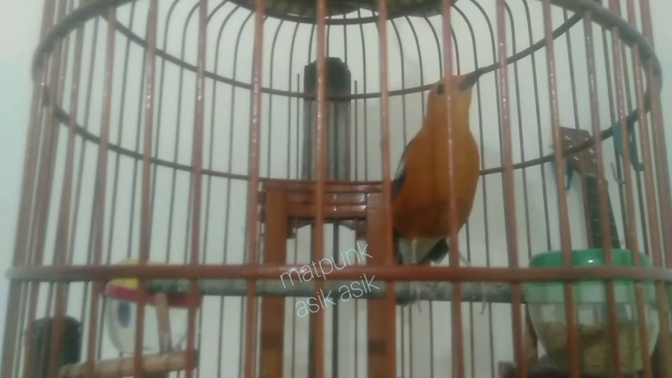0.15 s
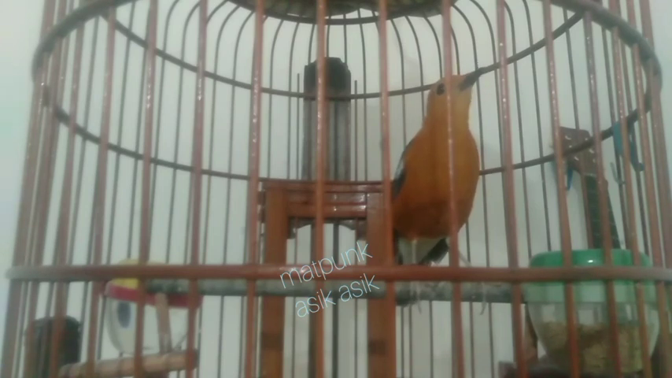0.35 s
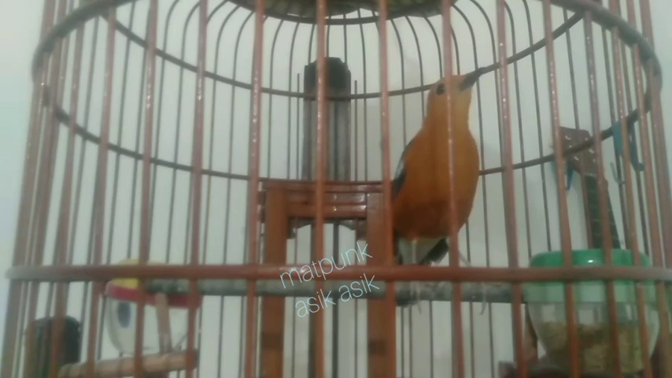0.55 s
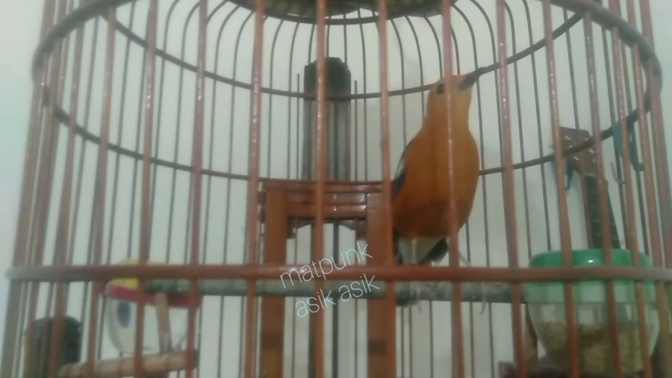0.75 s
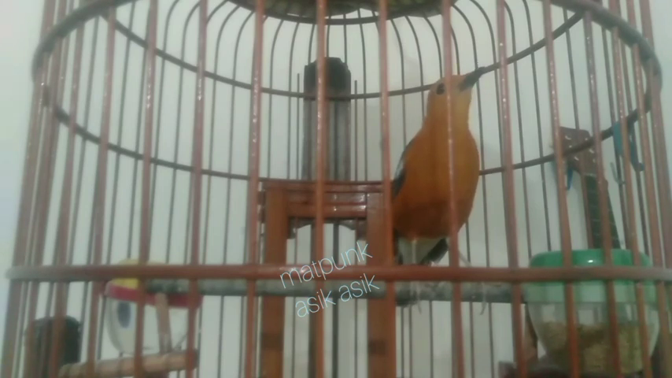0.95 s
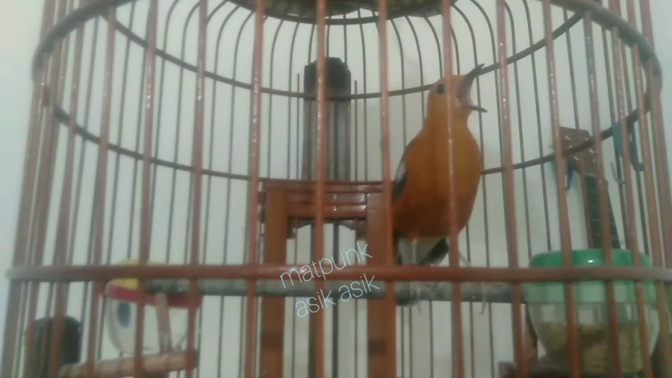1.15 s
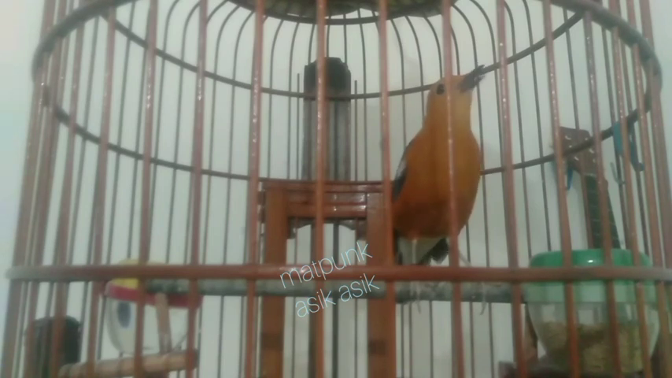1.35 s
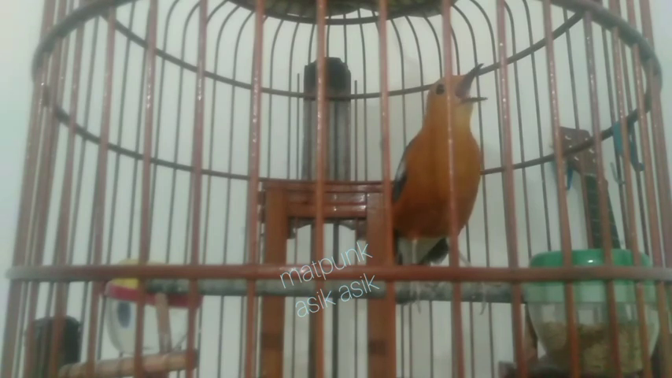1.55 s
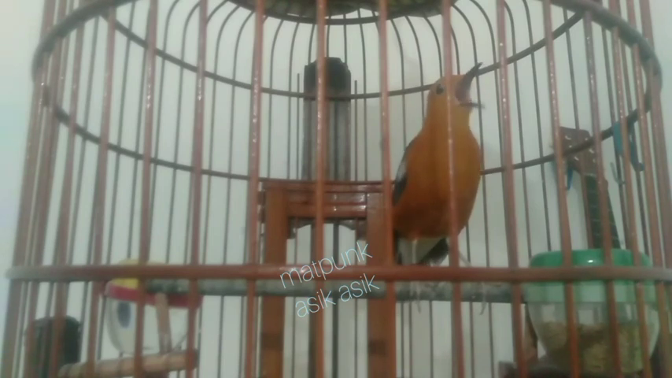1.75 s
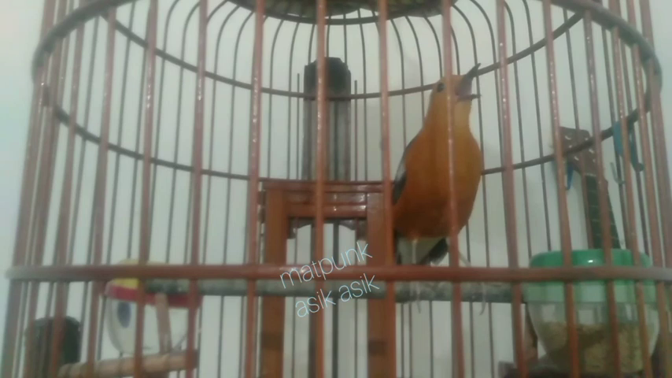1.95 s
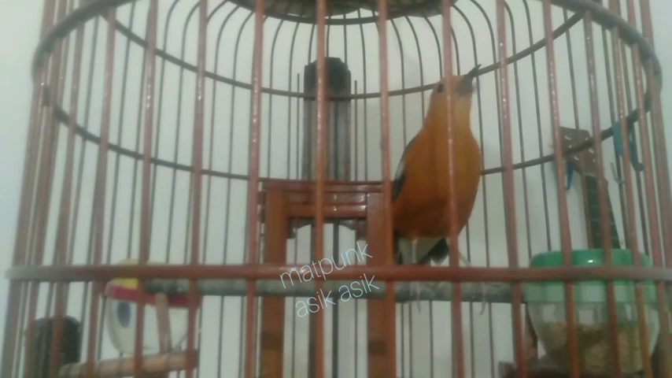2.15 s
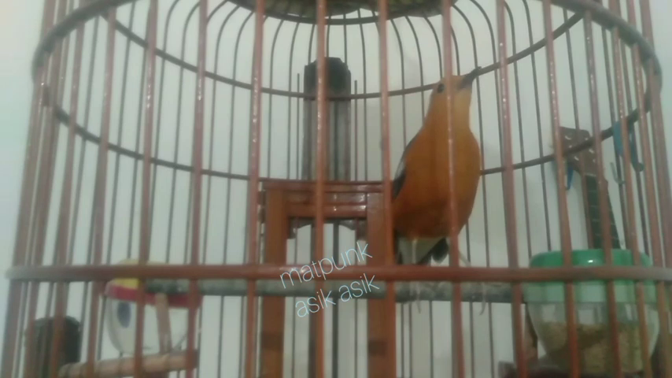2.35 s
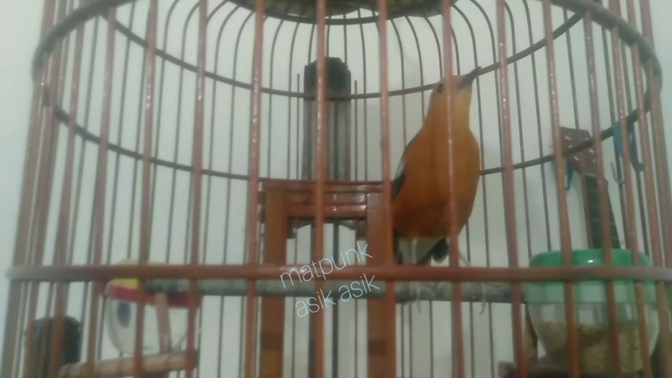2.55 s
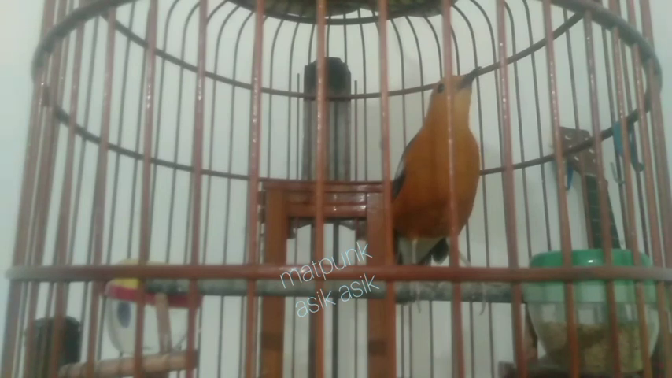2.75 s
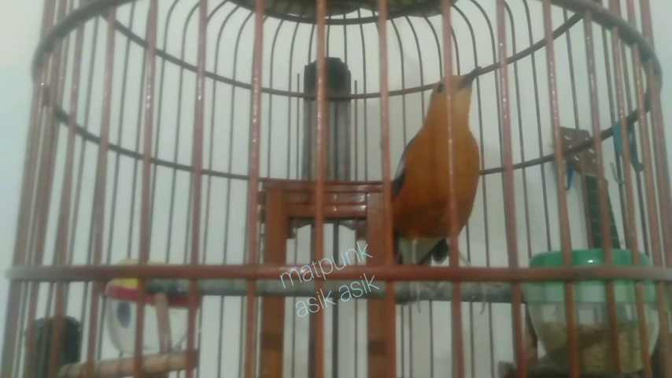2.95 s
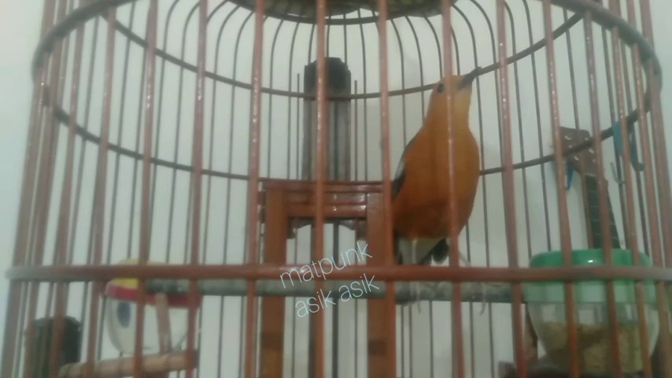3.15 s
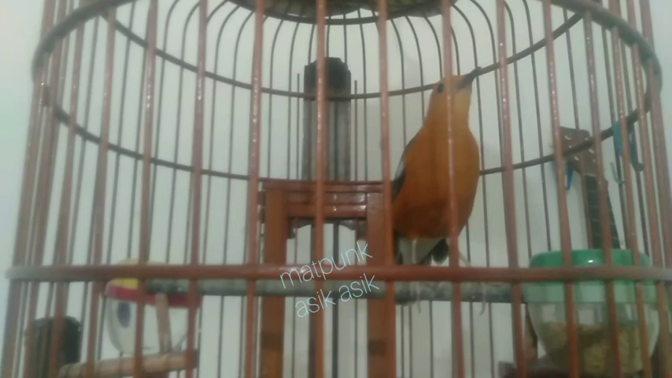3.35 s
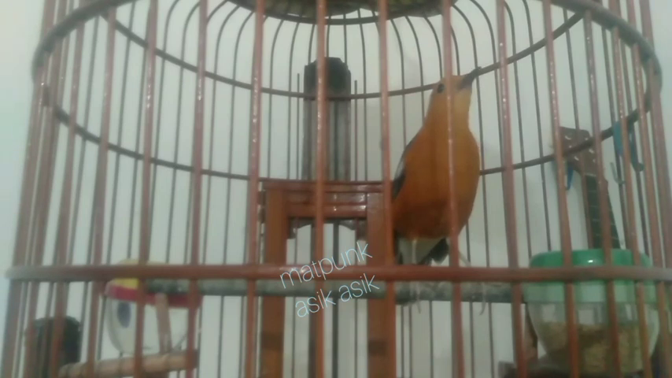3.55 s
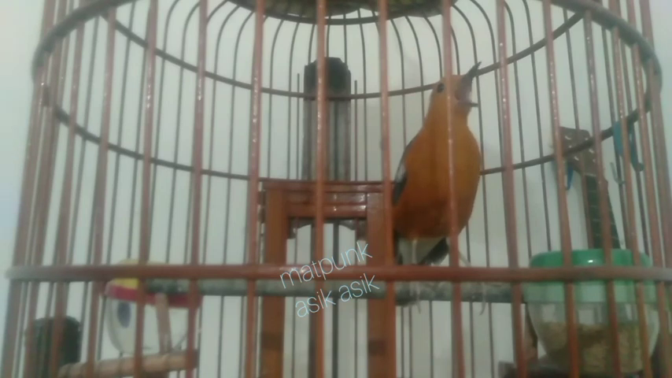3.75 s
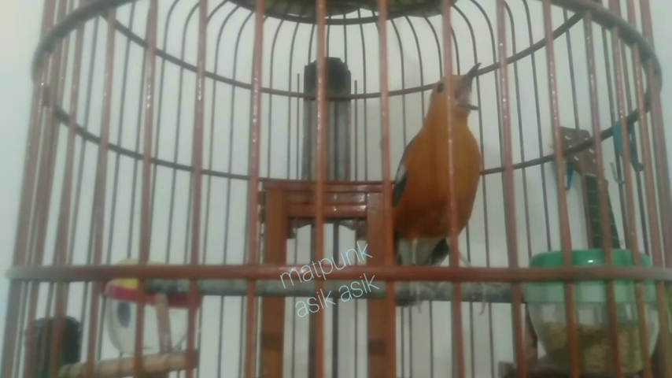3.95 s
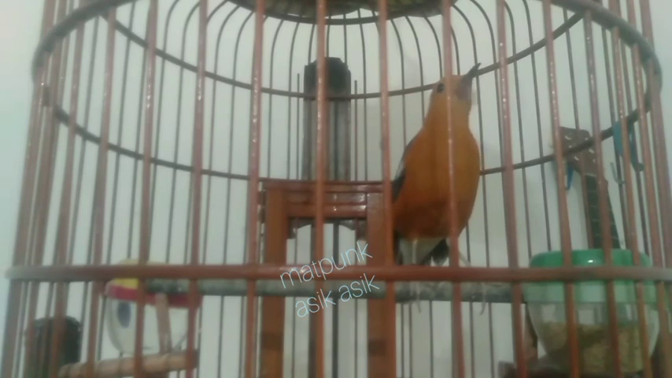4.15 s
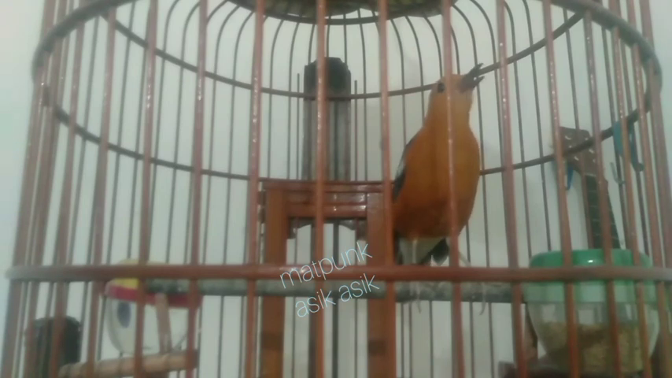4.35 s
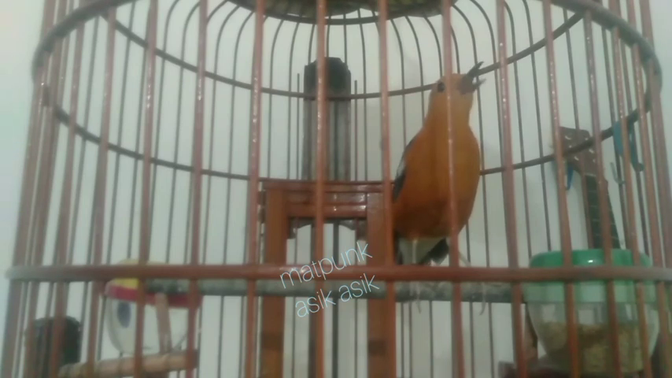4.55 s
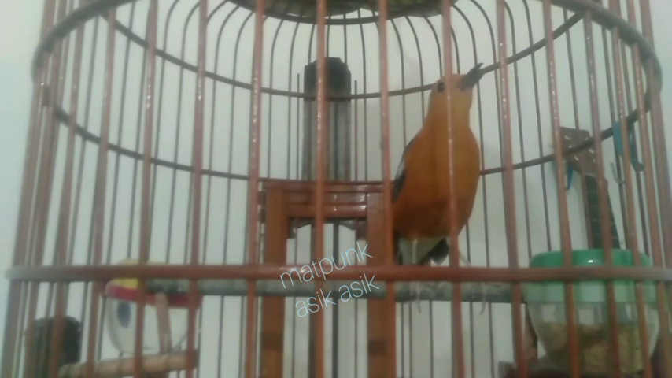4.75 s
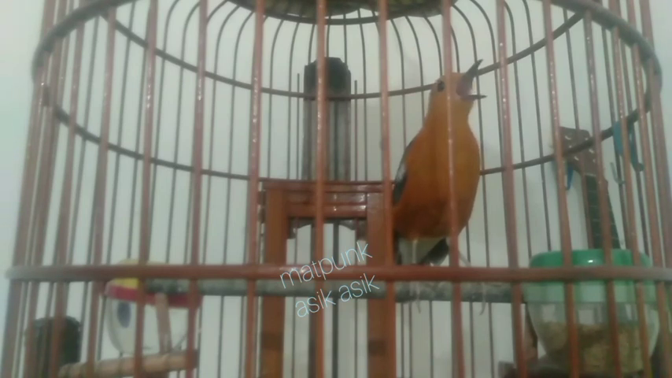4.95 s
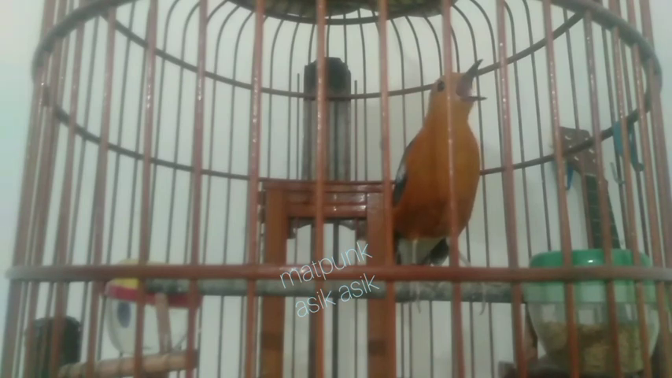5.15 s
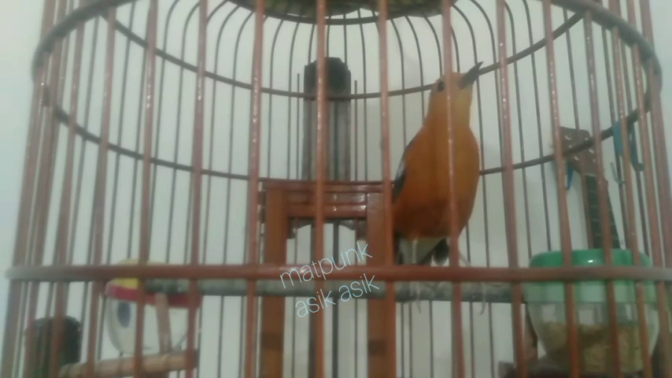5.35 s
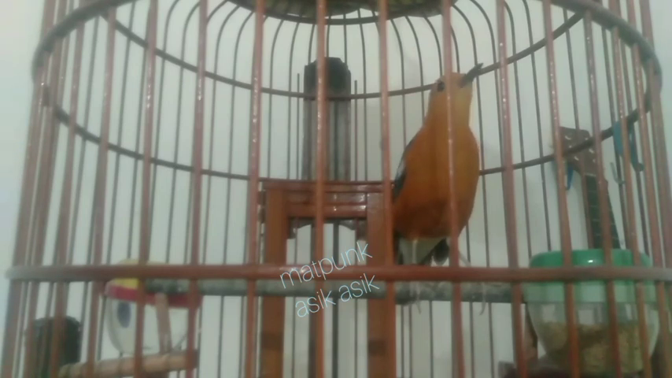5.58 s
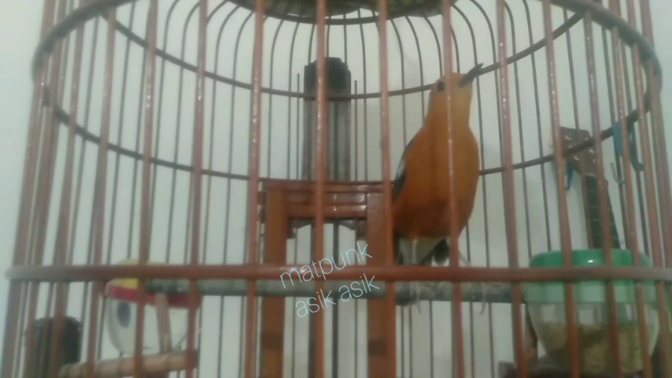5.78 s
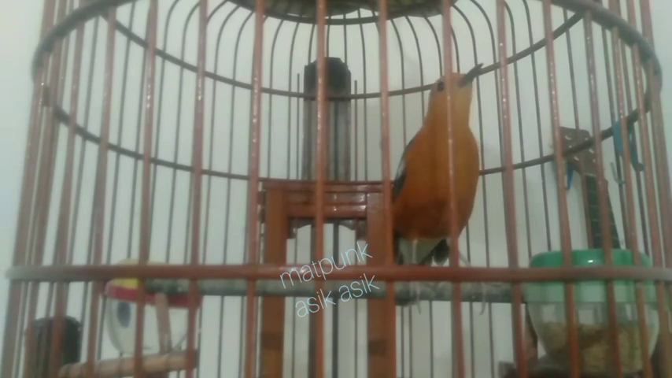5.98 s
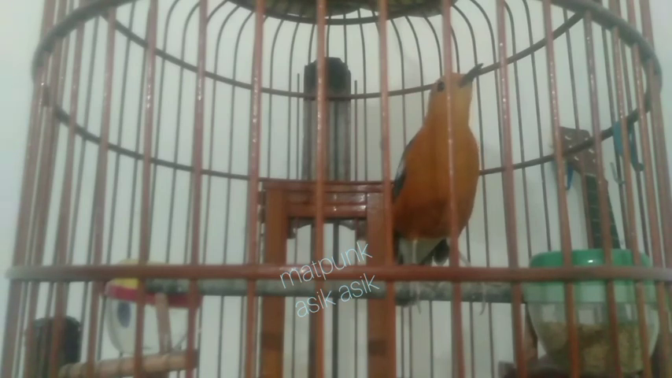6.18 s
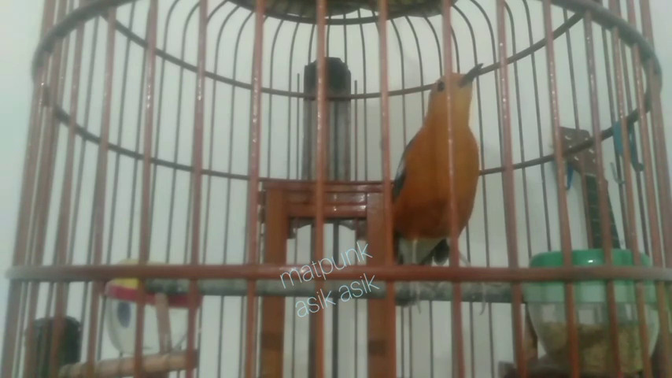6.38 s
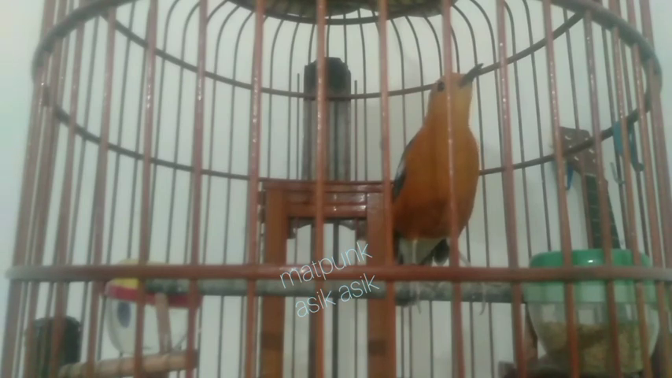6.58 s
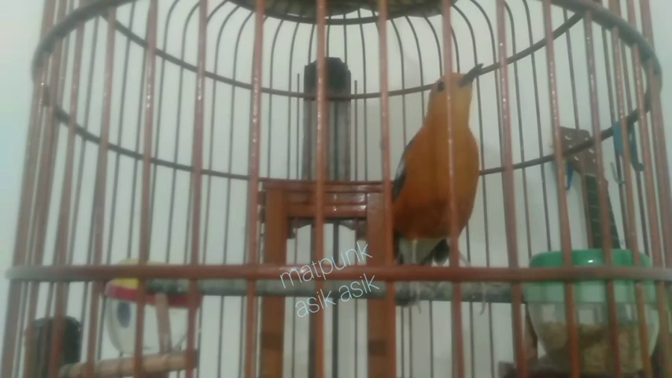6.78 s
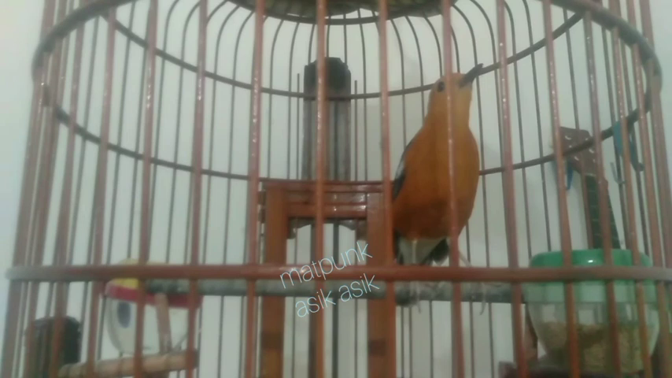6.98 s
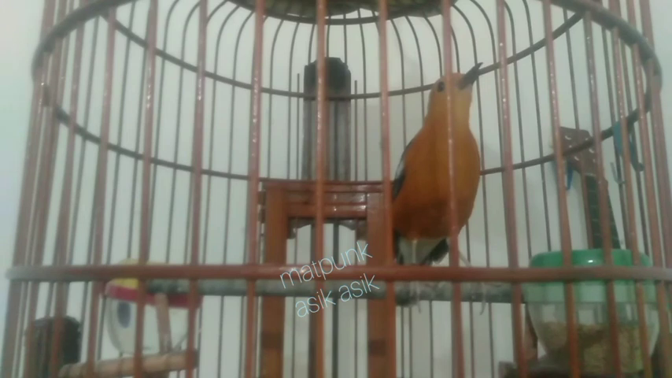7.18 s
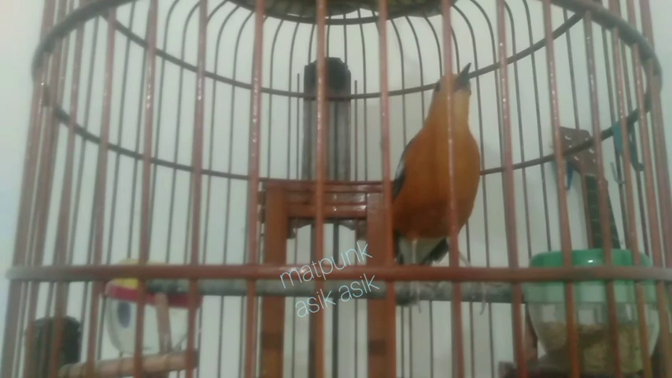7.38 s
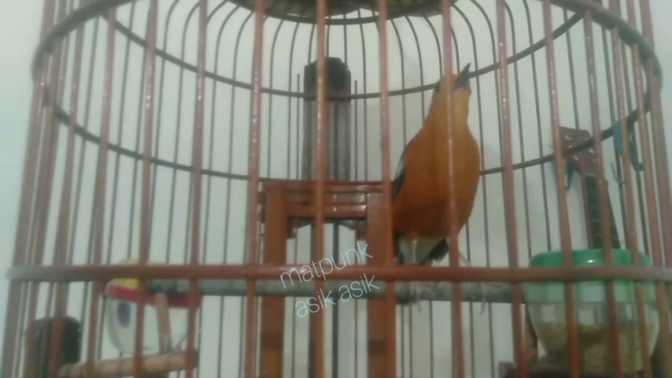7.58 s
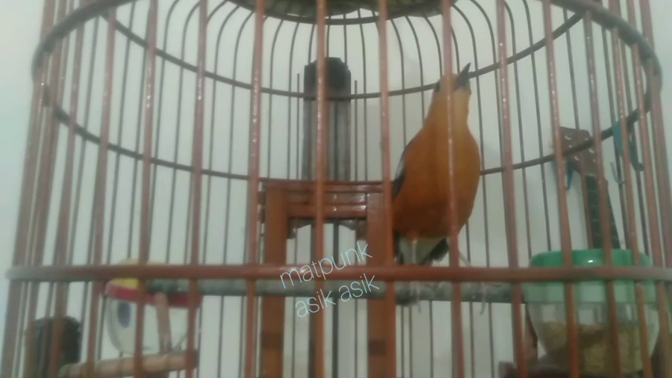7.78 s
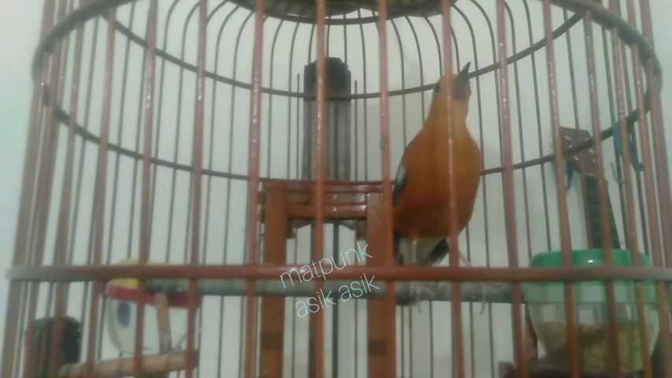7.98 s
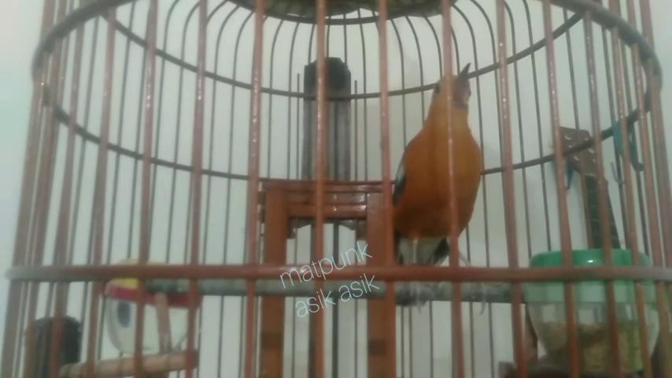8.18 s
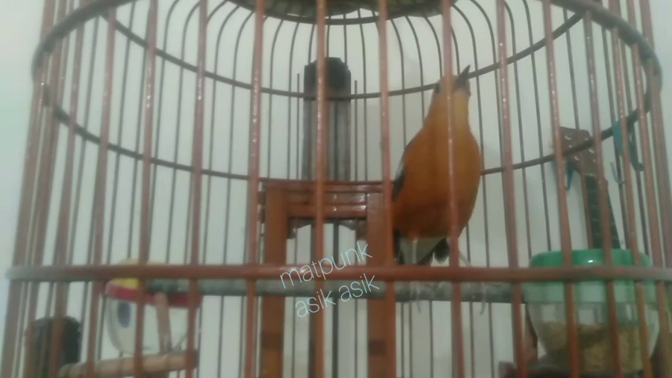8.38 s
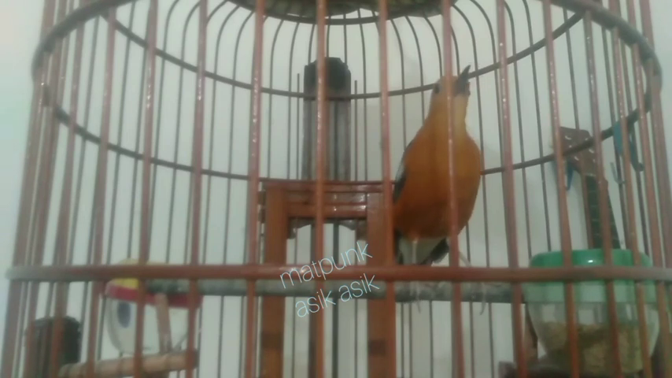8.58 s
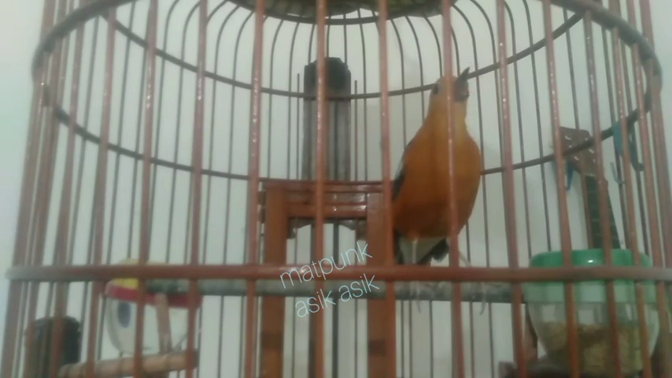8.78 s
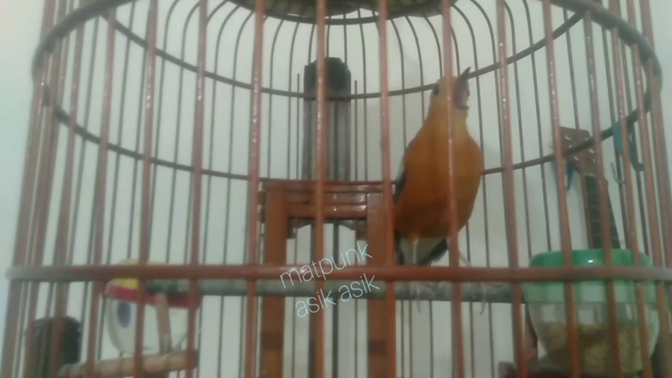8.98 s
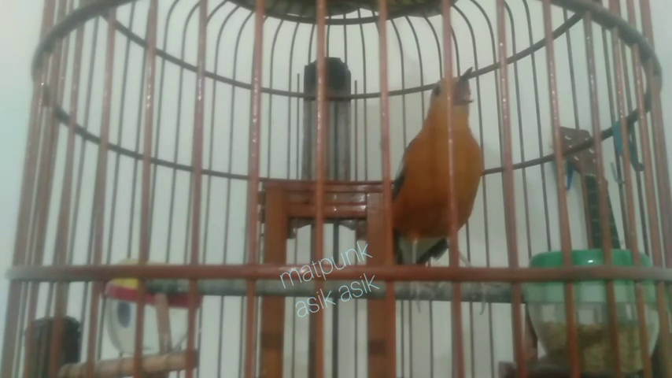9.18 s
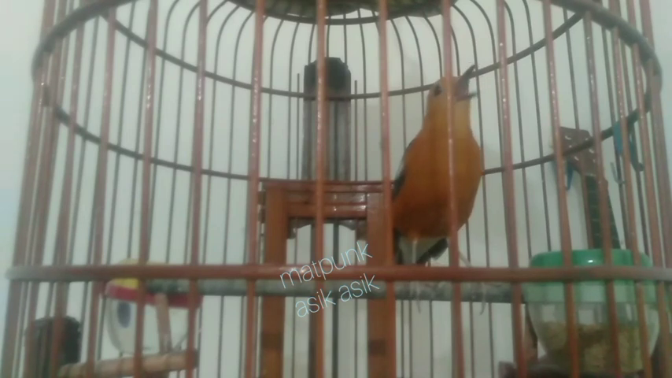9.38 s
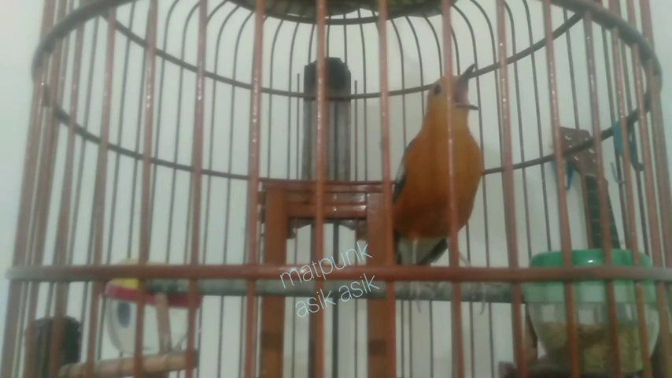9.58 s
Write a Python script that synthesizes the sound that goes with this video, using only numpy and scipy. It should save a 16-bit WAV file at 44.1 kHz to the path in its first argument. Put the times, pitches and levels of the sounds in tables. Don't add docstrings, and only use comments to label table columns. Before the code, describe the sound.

Loud, varied birdsong in three bursts, indoors and close, with a ringing room tail and slight overload on the peaks. Trill, glides, chirps and soft bubbling open; a long rattle, hoarse churrs and rapid jagged whips form the middle; pure whistles, sinking notes and sharp cheeps end it. In the gaps, faint echoing birds whistle far away over low traffic and steady hiss. Tyre roar is strongest at the start.

```python
import sys
import numpy as np
from scipy import signal
from scipy.fft import rfft, irfft, next_fast_len
from scipy.io import wavfile
from scipy.ndimage import uniform_filter1d, map_coordinates

SR = 44100
rng = np.random.default_rng(int(sys.argv[2]) if len(sys.argv) > 2 else 0)


def put_to_file(sound):
    columns = np.atleast_2d(sound).T
    safe = np.clip(columns, -1, 1)
    whole_steps = np.round(safe * 32767)
    wavfile.write(sys.argv[1], SR, whole_steps.astype(np.int16))


def gain_from_db(level_db):
    decades = np.asarray(level_db, float) / 20
    return 10 ** decades


N = 424683
LEAD = SR // 8


def unit(x):
    return x / np.sqrt(np.mean(x ** 2) + 1e-20)


def along(points, hz):
    f, v = np.transpose(points)
    return np.interp(np.log(hz + 1), np.log(f + 1), v)


def wobble(n, rate):
    return map_coordinates(rng.standard_normal(int(n * rate / SR) + 4), [np.arange(n) * rate / SR])


def coloured(x, points):
    m = next_fast_len(len(x) + 8192)
    response = gain_from_db(along(points, np.fft.rfftfreq(m, 1 / SR)))
    return irfft(rfft(x, m) * response, m)[:len(x)]


def add_tone(out, start_s, hz, db, partials_db, tract, rough):
    n = len(hz)
    centre_hz, width_hz, depth_db = tract
    flutter = 1 + .02 * rough * wobble(n, 400)
    phase = 2 * np.pi * np.cumsum(hz * flutter) / SR + rng.uniform(0, 2 * np.pi)
    strongest = np.argmax(partials_db)
    tone = np.zeros(n)
    for k, partial_db in enumerate(partials_db, 1):
        passed_db = depth_db / (1 + ((k * hz - centre_hz) / width_hz) ** 2) - depth_db
        rasp = 1 + 0.43 * rough * np.sqrt(k) * wobble(n, 1500)
        effort_db = 0.07 * max(k - 1 - strongest, 0) * (db - db.max())
        audible = k * hz < SR / 2.4
        tone += gain_from_db(partial_db + passed_db + effort_db) * rasp * np.sin(k * phase + k) * audible
    to_edge = np.minimum(np.arange(n), n - np.arange(n))
    edge = np.clip(to_edge / (.003 * SR), 0, 1)
    breath = gain_from_db(db + 3.0 * rough * wobble(n, 300))
    at = round(start_s * SR) + LEAD
    out[at:at + n] += (edge * breath * tone)[:len(out) - at]


def breaths(tables, partials_db, tract, rough):
    out = np.zeros(N + LEAD)
    for s, hz, db in map(np.transpose, tables):
        t = np.arange(s[0], s[-1], 1 / SR)
        soft = lambda v: uniform_filter1d(np.interp(t, s, v), size=120, mode="nearest")
        add_tone(out, s[0], soft(hz), soft(db), partials_db, tract, rough)
    return out


def repeated(shape, times):
    return [np.array(shape) * (stretch, pitch, 1) + (s, 0, db) for s, stretch, pitch, db in times]


def trill(rows, partials_db, tract, sharp, crest_db, rough, bump=0):
    out = np.zeros(N + LEAD)
    s, crest, trough, db = np.transpose(rows)
    t = np.arange((s[0] + s[1]) / 2, (s[-2] + s[-1]) / 2, 1 / SR)
    crests = np.cumsum(np.round(np.diff(s, prepend=s[0]) / .025))
    beat = np.pi * np.interp(t, s, crests)
    leap = np.abs(np.cos(beat)) ** sharp + bump * np.abs(np.sin(beat)) ** 6.5
    low = np.interp(t, s, trough)
    hz = low + leap * (np.interp(t, s, crest) - low)
    level_db = np.interp(t, s, db) + np.linspace(*crest_db, len(t)) * (leap - .5)
    add_tone(out, t[0], hz, level_db, partials_db, tract, rough)
    return out


def coupled_trill(rows, upper_db, lower_db):
    s, crest, under, trough, db = np.transpose(rows)
    passed = 1 - np.exp(-(s - s[0]) / .09)
    upper = np.transpose([s, crest, 1.08 * trough, db + np.interp(passed, (0, 1), upper_db)])
    lower = np.transpose([s, under, .875 * trough, db + np.interp(passed, (0, 1), lower_db)])
    octave = np.transpose([s, 1.7 * under, 1.8 * trough, db - 23.5 + 10 * passed])
    song = trill(upper, (-1.5, -30, -19, -18.5), (3000, 2500, 3), sharp=6, crest_db=(5, -1.5), rough=.4)
    song += trill(lower, (-0.5, -20.5, -16, -22, -16.5), (3500, 2500, 4), sharp=2.4,
                  crest_db=(3, 1.5), rough=0.4, bump=.33)
    return song + trill(octave, (0,), (5500, 1500, 6), sharp=4, crest_db=(-6, -4), rough=1.4)


# (time [s], level [dB])
TRAFFIC = [(0, -37.5), (.45, -34.5), (1.08, -43), (1.3, -55), (2.4, -58), (3.7, -51), (4.6, -54.5),
           (5.6, -55), (7.6, -50), (8.2, -57), (9.63, -60)]
# (time [s], gain [dB])
GAIN = [(0, 1), (1.1, 6), (2.4, -2), (3.7, 2.5), (5.5, 1), (8, 4), (9.63, 4)]
# (frequency [Hz], density [dB])
RUMBLE = [(12, -30.5), (20, 5.5), (38, -6.5), (86, 4), (98, 1), (113, -23), (140, 2), (189, -2),
          (307, -25.5), (327, -35.5), (362, -34), (400, -26.5), (520, -56.5), (880, -120)]
ROAR = [(120, -27), (200, 5.5), (336, -3), (365, -7.5), (626, -5.5), (1550, -27), (2500, -34),
        (3250, -64.5), (5500, -120)]
HISS = [(590, -28.5), (1000, -1.5), (1170, -6), (1240, -3.5), (1460, -6.5), (1580, -5), (3540, -12.5),
        (15600, -9)]


def street():
    t = np.arange(N) / SR
    roar_db = np.interp(t, *np.transpose(TRAFFIC))
    hiss_db = -57.5 + np.interp(t, *np.transpose(GAIN))
    rumble_db = -40.5 + 0.38 * (roar_db + 58)
    noise = lambda spectrum: unit(coloured(rng.standard_normal(N), spectrum))
    rumble = gain_from_db(rumble_db + 0.43 * wobble(N, 1.4)) * noise(RUMBLE)
    roar = gain_from_db(roar_db + 1.2 * wobble(N, 9.4)) * noise(ROAR)
    return rumble + roar + gain_from_db(hiss_db) * noise(HISS)


# (time [s], upper crest [Hz], lower crest [Hz], trough [Hz], level [dB])
OPENING = [
    (-.08, 4650, 3447, 2630, -9),
    (-.054, 4545, 3413, 2700, -5.5),
    (-.003, 4744, 3510, 2763, 1.5),
    (.023, 3646, 2960, 2772, -4),
    (.049, 3400, 2510, 2300, -10.5),
]


def opening_trill():
    return coupled_trill(OPENING, upper_db=(-6, 0.5), lower_db=(-4, -8))


# (time [s], pitch [Hz], level [dB])
GLIDES = [
    [(1.091, 3460, -15.5), (1.1, 3665, -2.5), (1.111, 3385, -14.5), (1.12, 2552, 3), (1.128, 2380, -0.5),
     (1.139, 2790, -10), (1.152, 1934, -4.5), (1.167, 2207, 1.5), (1.18, 1564, -14.5)],
    [(1.216, 3590, -16), (1.222, 3700, -8.5), (1.258, 3305, -16), (1.266, 2667, -4.5), (1.273, 2228, -4.5),
     (1.286, 2309, -1), (1.294, 2520, -0.5), (1.303, 1800, -4), (1.312, 1704, -15), (1.324, 1990, -6),
     (1.338, 1507, -12)],
]
# (time [s], pitch [Hz], level [dB])
UNDER = [
    [(1.097, 3610, -11.5), (1.106, 3565, -7.5), (1.114, 2690, -2.5), (1.125, 2345, -11), (1.139, 2810, -11),
     (1.147, 2200, -16)],
    [(1.216, 2500, -28), (1.235, 3372, -10), (1.249, 2969, -7), (1.258, 3000, -11.5), (1.268, 2362, -9)],
]
OCTAVE = (-29.5, -9.5, -31.5, -23.5, -34, -35.5)
PURE = (1, -31.5, -37.5, -48, -45)


def glides():
    return breaths(GLIDES, OCTAVE, (9300, 2200, -13), rough=0.16) + breaths(UNDER, PURE, (3200, 2500, 3), rough=0.017)


# (time [s], climb [s], dip [Hz], level [dB], wag [dB])
CHIRPS = [
    (1.498, 0.015, 2920, -1, -2.5),
    (1.568, .017, 3354, 2.5, -4),
    (1.637, .017, 3500, 2.5, -4),
    (1.704, 0.019, 3606, 2.5, 0.5),
]


def chirps():
    wag_s = .0048
    tables = []
    for s, climb, dip, db, wag_db in CHIRPS:
        top_s = s + climb
        tables.append([(s, 1850, db - 21.5), (s + 0.47 * climb, 2750, db - 6), (top_s, 4550, db - 0.7),
                       (top_s + wag_s, dip, db + wag_db), (top_s + 2 * wag_s, 4400, db + wag_db - 3),
                       (top_s + 2.8 * wag_s, 3800, db + wag_db - 10)])
    ahead = [np.array(table[:3]) + (-.003, 800, -7) for table in tables]  # s, Hz, dB
    song = breaths(tables, (2.0, -18.5, -17.5, -19.5), (4000, 1200, 12), rough=1.0)
    return song + breaths(ahead, (1.5,), (3800, 900, 14), rough=1.845)


# (time [s], pitch [Hz], level [dB])
SEEP = [
    [(1.738, 6800, -31), (1.76, 6800, -23), (1.78, 6960, -20.5), (1.81, 7195, -14), (1.83, 6713, -27.5)],
]
THIN = (0, -1.7)


def seep():
    return breaths(SEEP, THIN, (7000, 3000, 1.5), rough=.15)


# (time [s], crest [Hz], trough [Hz], level [dB])
BUBBLING = [(1.943, 1874, 1206, -23.5), (1.97, 2014, 1215, -1), (1.989, 1836, 1245, -10),
            (2.01, 1749, 1216, -8.5), (2.039, 1733, 1169, -13.5), (2.065, 1710, 1158, -9),
            (2.088, 1704, 1191, -12.5), (2.113, 1691, 1222, -10), (2.135, 1751, 1217, -15),
            (2.158, 1822, 1238, -16.5), (2.179, 1828, 1240, -21), (2.199, 1744, 1280, -16)]
HOLLOW = (-35, 5, -22.5, -27.5, -32.5)
# (time from its start [s], pitch [Hz], level [dB])
STROKE = [(0, 3900, -22.5), (.006, 4700, -15.5), (.013, 5855, -23)]
# (time [s], stretch [ratio], pitch [ratio], level [dB])
STROKES = [
    (2.02, 1, 0.82, 0),
    (2.048, 0.5, 0.76, 0),
    (2.096, 0.78, 1.0, 0),
]


def bubbling():
    rows = np.array(BUBBLING)
    s, crest, trough, db = rows.T
    late = (s - s[0]) / np.ptp(s)
    upper = np.transpose([s, crest * (2.5 + 0.47 * late ** 2), trough * 3.2, db - 11 + 13 * late])
    song = trill(rows, HOLLOW, (3500, 1500, 5), sharp=1.8, crest_db=(8, 21), rough=.28)
    song += trill(upper, (0, -12), (5000, 2000, 3), sharp=1.9, crest_db=(3, 7), rough=1.3)
    return song + breaths(repeated(STROKE, STROKES), (0,), (5000, 2000, 0), rough=.4)


# (frequency [Hz], t60 [s])
ROOM = [(1500, 0.028), (2600, 0.64), (3600, 0.51), (6000, 0.43), (13000, 0.33)]


def room(x, longer):
    hz, t, z = signal.stft(rng.standard_normal(SR), SR, nperseg=256)
    decay = gain_from_db(-60 * t / (longer * along(ROOM, hz)[:, None]))
    tail = signal.istft(z * decay, SR, nperseg=256)[1]
    return signal.fftconvolve(np.pad(x, (300, 0)), tail / np.linalg.norm(tail))[:len(x)]


def far_notes(rows, reach_s):
    tables = []
    for s, length, a, b, db in rows:
        reach = min(reach_s, .9 * length)
        attack = .012
        tables.append([(s, a, db - 5), (s + attack, a + (b - a) * attack / reach, db),
                       (s + reach, b, db), (s + length, b, db - 5)])
    return tables


# (time [s], length [s], from [Hz], to [Hz], level [dB])
SWOOPS = [(3.11, 0.042, 3133, 3100, -55), (3.11, 0.028, 2765, 2380, -58.5), (3.7, 0.029, 2400, 2425, -54),
          (5.87, 0.2, 2500, 3053, -55.5), (6.19, 0.12, 2134, 2500, -51.5),
          (6.315, 0.046, 2760, 2370, -52.5), (6.42, 0.07, 2360, 2543, -55), (6.44, 0.025, 2600, 3520, -56),
          (6.465, 0.03, 3310, 3230, -50), (6.55, 0.042, 2740, 2426, -53.5),
          (7.36, 0.076, 2770, 2498, -56.5), (7.61, 0.047, 2830, 2410, -57), (7.87, 0.067, 2485, 2630, -62),
          (7.255, 0.044, 2050, 1810, -58), (7.425, 0.067, 2025, 1740, -58),
          (7.595, 0.046, 2004, 1784, -53.5), (7.8, 0.05, 2030, 1700, -59.5)]
# (time [s], length [s], from [Hz], to [Hz], level [dB])
SLIDES = [(3.2, 0.078, 3110, 2836, -56.5), (3.32, 0.14, 3270, 3000, -56.5), (3.41, 0.16, 3080, 3480, -59.5),
          (3.55, 0.061, 3424, 3440, -63), (6.52, 0.15, 1805, 1918, -59), (6.71, 0.22, 1850, 2050, -48),
          (6.96, 0.15, 2080, 2085, -63), (7.07, 0.074, 2072, 1780, -50.5), (6.82, 0.13, 2310, 2654, -58),
          (6.93, 0.13, 2646, 2620, -77), (7.13, 0.024, 2570, 2430, -63), (7.36, 0.057, 3020, 2800, -64),
          (7.525, 0.017, 1494, 1255, -54)]


def far_birds():
    tables = far_notes(SWOOPS, .035) + far_notes(SLIDES, np.inf)
    calls = breaths(tables, (0,), (2500, 2000, 0), rough=.42)
    return gain_from_db(5.5) * calls + gain_from_db(7.5) * room(calls, longer=0.98)


# (time [s], upper crest [Hz], lower crest [Hz], trough [Hz], level [dB])
RATTLING = [(3.714, 4965, 3025, 1462, -23.5), (3.742, 5263, 3271, 2455, -3), (3.763, 4887, 3099, 2525, -3),
            (3.787, 4447, 3112, 2785, -1), (3.836, 4230, 3245, 2785, -0.5), (3.913, 4284, 3620, 2763, -1),
            (3.99, 4520, 3530, 2719, -3.5), (4.043, 4647, 3637, 2758, -1.5), (4.095, 4836, 3630, 2700, -3),
            (4.151, 4906, 3497, 2627, -2.5), (4.175, 3807, 3266, 2830, -10), (4.2, 3500, 2910, 2805, -13.5)]


def rattling_trill():
    return coupled_trill(RATTLING, upper_db=(5, -6), lower_db=(-18, -1.5))


# (time [s], pitch [Hz], level [dB])
STRANDS = [
    [(7.989, 2987, -14.5), (7.997, 3459, -7), (8.009, 4993, -25)],
    [(8.645, 2503, -16.5), (8.654, 2930, -15.5), (8.662, 2500, -13)],
    [(3.728, 4150, -11.5), (3.737, 5020, 1)],
    [(3.748, 5186, -13.5), (3.76, 5210, -12), (3.79, 5447, -13)],
    [(8.19, 4954, -20.5), (8.25, 4515, -17.5), (8.3, 4316, -22)],
]


def hoarse_strands():
    return breaths(STRANDS, (0,), (3200, 2500, 3), rough=1.0)


# (time from its start [s], pitch [Hz], level [dB])
FLICK = [(.001, 1700, -24), (.007, 2500, -10), (.011, 3900, -5), (.015, 2750, -5), (.019, 2420, -7),
         (.024, 2715, -12.5)]
# (time from its start [s], pitch [Hz], level [dB])
RASP = [(.003, 3594, -26), (.008, 4995, -17), (.012, 6200, -13), (.019, 3900, -11.5), (.026, 5000, -12),
        (.04, 4700, -22)]
# (time from its start [s], pitch [Hz], level [dB])
CHURR = [(.018, 2485, -7), (.028, 2713, -9), (.05, 2868, -7), (.066, 2813, -12), (.074, 2740, -9),
         (.085, 2678, -22)]
# (time [s], stretch [ratio], pitch [ratio], level [dB])
CHURRS = [
    (4.281, .99, 0.97, -3.5),
    (4.474, .99, 0.98, -4.5),
    (4.659, 0.93, 0.99, -4),
]
REEDY = (1, 5, -5, -11.5, -16)


def churrs():
    body = repeated(CHURR, CHURRS)
    sideband = [row * (1, 1.5, 1) for row in body]
    twin = [row * (1, 1.07, 1) for row in body]
    song = breaths(repeated(FLICK, CHURRS), (3, -20, -14), (4000, 3000, 3), rough=0.72)
    song += breaths(repeated(RASP, CHURRS), (0,), (5000, 3000, 0), rough=2.0)
    song += breaths(body, REEDY, (4000, 3000, 3), rough=0.697)
    song += breaths(sideband, (-19,), (4000, 3000, 0), rough=1.5)
    return song + breaths(twin, (5, -6), (3000, 3000, 0), rough=0.11)


def swings(count):
    k = np.arange(count)
    first_s, half_s, quicken = 0.014, 0.0067, 0.92
    centre_hz, swing_hz, settle, db = 5800, 1594, 0.73, -4
    turn_s = first_s + half_s * (1 - quicken ** k) / (1 - quicken)
    turns = np.transpose([turn_s, centre_hz + swing_hz * (-settle) ** k, db + 0 * k])
    return [(.002, 4200, db - 7.5), (first_s / 2, 6700, db - 5.0), *turns]


# (time from the start [s], pitch [Hz], level [dB])
SPLIT = [(0, 1141, 3), (.005, 2244, -2.5), (.01, 2647, 3.5), (.014, 1958, -18), (.017, 1115, 2.5),
         (.024, 2628, 2), (.031, 2385, -8.5), (.042, 2768, -3)]
WHIP = [(0, 1258, -13), (.006, 2187, -3.5), (.013, 2578, 3), (.019, 1912, -4.5), (.026, 2555, 0.5),
        (.032, 2272, -1.5), (.04, 2624, -3), (.048, 2500, -12.5)]
# (time from its start [s], pitch [Hz], level [dB])
ARCHES = [(.002, 4560, -8.5), (.007, 7170, -7.5), (.011, 7164, -8), (.016, 3990, -31), (.025, 7900, 0),
          (.031, 4990, -14)]
# (time [s], pitch [Hz], level [dB])
SWIPE = [(0, 2373, 7), (.003, 3080, 1.5), (.008, 4500, -29)]
LATE_SWIPE = [(0, 2650, 0), (.004, 3200, -4), (.01, 4500, -18)]
# (time [s], stretch [ratio], pitch [ratio], level [dB])
SPLITS = [
    (4.871, 1.0, 1.0, -13),
    (4.933, 1.05, 0.97, -9.5),
]
WHIPS = [
    (5.001, .9, .98, -10),
    (5.069, .95, .98, -8.5),
    (5.135, 1.02, 1.02, -8),
    (5.214, 1.06, .98, -8),
    (5.291, .97, .95, -9),
]
STACK = (-12.5, 2, -6, -9.5, -9, -9.5, -17)


def whips():
    early, late = WHIPS[:3], WHIPS[3:]
    song = breaths(repeated(SPLIT, SPLITS) + repeated(WHIP, early), STACK, (5000, 1200, 9), rough=.55)
    song += breaths(repeated(WHIP, late), (-22, *STACK[1:]), (5000, 1200, 9), rough=0.18)
    song += breaths(repeated(SWIPE, SPLITS + early), (0,), (4000, 3000, 0), rough=0.95)
    song += breaths(repeated(LATE_SWIPE, late), (0, -25), (4000, 3000, 0), rough=.4)
    second = repeated(swings(count=7), WHIPS) + repeated(ARCHES, SPLITS)
    return song + breaths(second, (0, -14), (5300, 2000, 3), rough=0.71)


# (time [s], pitch [Hz], level [dB])
WHISTLES = [
    [(7.992, 1502, -17), (8.004, 2288, -3.5), (8.016, 2925, 5), (8.03, 3088, 3.5), (8.054, 3143, -0.5),
     (8.06, 3174, -12.5), (8.068, 3134, 1), (8.094, 3110, 1), (8.101, 3095, -7), (8.17, 3017, -11),
     (8.19, 2876, -14), (8.23, 2526, -17), (8.3, 2332, -21.5)],
    [(8.082, 3774, -16.5), (8.11, 3936, -9.5), (8.19, 3784, -9), (8.22, 3664, 1), (8.247, 3515, 0.5),
     (8.252, 3485, -9), (8.257, 3502, 0.5), (8.292, 3478, 1.5), (8.301, 3075, -1)],
    [(8.752, 2151, -10), (8.775, 2272, 1), (8.8, 2383, -5), (8.813, 2305, -20.5)],
    [(8.906, 2744, 10.5), (8.914, 3127, 4.5), (8.926, 3087, 1.5), (8.942, 2701, 0.2), (8.968, 2626, 0),
     (8.975, 2666, -0.5), (8.982, 2598, 0.1), (9.007, 2721, -2.6), (9.03, 3058, -0.9), (9.045, 3085, 7),
     (9.061, 3005, -6.5)],
    [(9.17, 5723, -31.5), (9.182, 6080, -20), (9.195, 5410, -5.5), (9.208, 4800, -11)],
]
# (time from its start [s], pitch [Hz], level [dB])
SAG = [(0, 2333, -1.5), (.012, 2224, 1), (.035, 2177, -2.5), (.074, 2235, 0.5), (.085, 2260, -25)]
# (time [s], stretch [ratio], pitch [ratio], level [dB])
SAGS = [
    (8.566, 1.0, 1.0, 0),
    (8.66, 1.1, 1.005, 1.5),
]


def whistles():
    clear = WHISTLES[:1] + WHISTLES[2:] + repeated(SAG, SAGS)
    song = breaths(clear, PURE, (3200, 2500, 3), rough=0.017)
    return song + breaths(WHISTLES[1:2], (2.5, -40, -38, -36), (3200, 2500, 3), rough=.13)


# (time [s], pitch [Hz], level [dB])
HOOKS = [
    [(9.168, 3916, -16), (9.176, 4720, 3), (9.19, 4590, 2.5), (9.204, 3480, -13)],
    [(9.311, 4186, -5.5), (9.32, 4677, 1), (9.335, 4275, 1), (9.355, 3675, -2), (9.384, 3018, -1.5)],
    [(9.313, 2893, -7.5), (9.32, 3850, -7), (9.334, 3514, -3.5), (9.355, 2500, -12)],
    [(9.521, 4260, -11), (9.527, 4800, 3), (9.545, 4407, -1.5), (9.565, 3930, -1.5), (9.63, 4193, -0.5)],
    [(9.521, 2837, -10), (9.527, 4290, -6), (9.54, 3676, -1.5), (9.562, 2804, -7.5), (9.63, 2542, -15.5)],
]


def hooked_cheeps():
    return breaths(HOOKS, (1.5, -23.5, -28.5, -44), (3200, 2500, 3), rough=0.29)


# (frequency [Hz], gain [dB])
THROAT = [(700, -29.5), (1500, -9), (2200, 1), (4000, -2.5), (6500, -2), (10000, 8), (13500, 12),
          (16000, 2)]


def thrush():
    song = opening_trill() + glides() + chirps() + seep() + bubbling() + rattling_trill()
    song += hoarse_strands() + churrs() + whips() + whistles() + hooked_cheeps()
    return coloured(song, THROAT)


# (delay [s], level [dB])
WALLS = [(.0021, -29), (.0047, -14.5), (.0083, -23), (0.013, -19.5), (.017, -19.5), (0.023, -18)]


def near_walls(song):
    return sum(gain_from_db(db) * np.roll(song, round(s * SR)) for s, db in WALLS)


def scene():
    song = thrush()
    near = song + near_walls(song)
    birds = near + gain_from_db(-12) * room(song, longer=0.21) + gain_from_db(-12.5) * room(song, longer=1.0) + far_birds()
    return (birds[LEAD:] + street())[None]


# (frequency [Hz], gain [dB])
PORT = [(20, -5.5), (60, -6), (150, -11.5), (300, -3.5), (2200, -0.23), (4500, -1), (7000, -2),
        (13300, -3.5), (15600, -2.5), (15950, -37)]


def overloaded(x):
    hard = 7
    clipped = x / (1 + np.abs(x / 0.69) ** hard) ** (1 / hard)
    bent = clipped ** 2 - uniform_filter1d(clipped ** 2, size=60)
    return coloured(clipped + 0.04 * bent, PORT)


def roll_off(x):
    return signal.sosfilt(signal.butter(12, 15750, fs=SR, output="sos"), x)


def record(dry):
    mix = overloaded(dry[0])[None]
    return roll_off(mix)


dry = scene()
out = record(dry)
put_to_file(out)
```